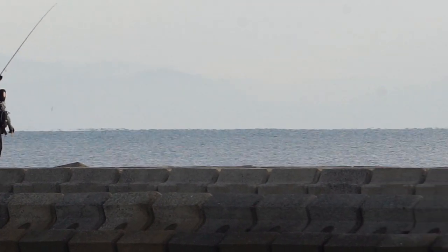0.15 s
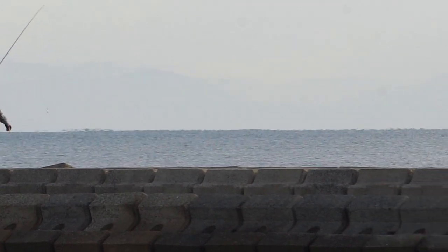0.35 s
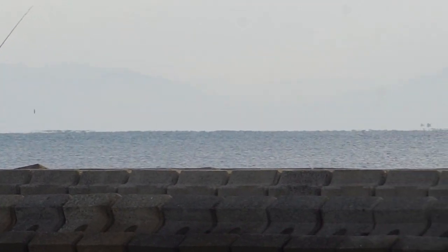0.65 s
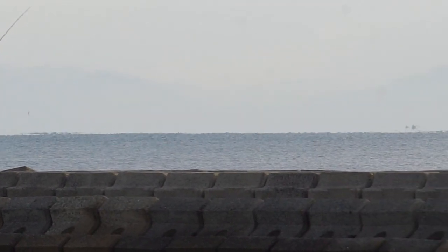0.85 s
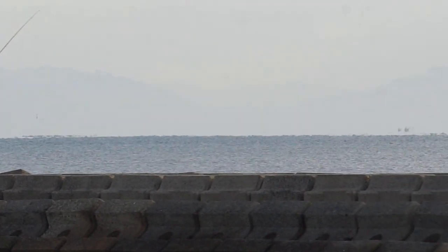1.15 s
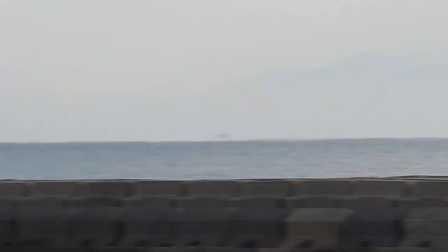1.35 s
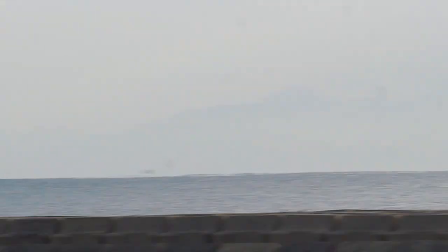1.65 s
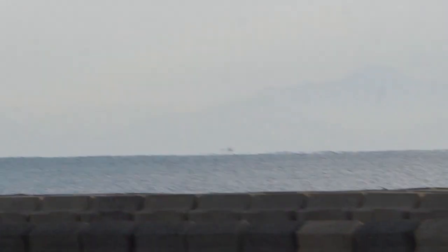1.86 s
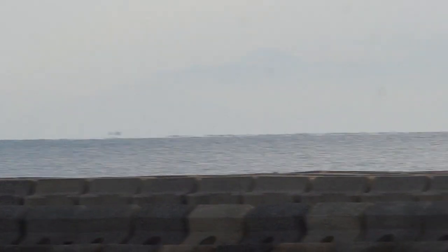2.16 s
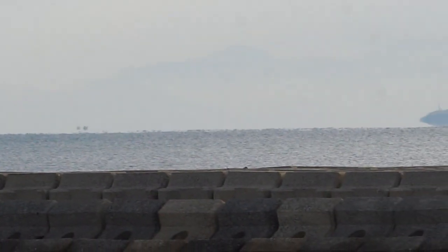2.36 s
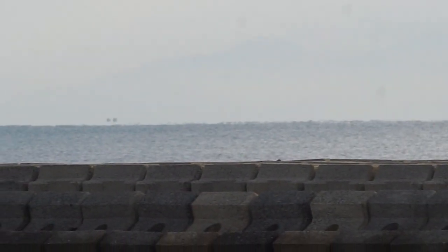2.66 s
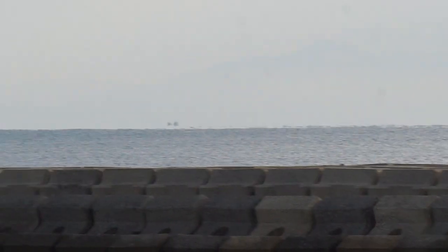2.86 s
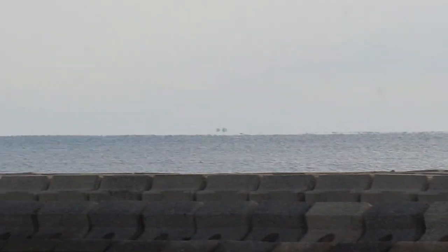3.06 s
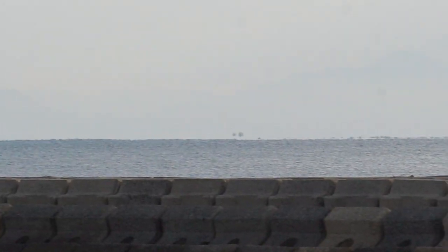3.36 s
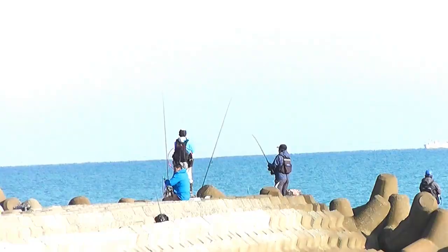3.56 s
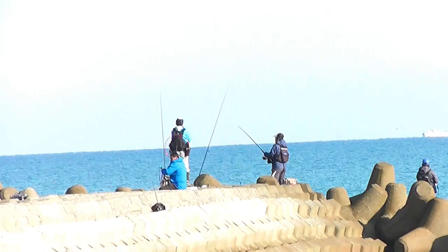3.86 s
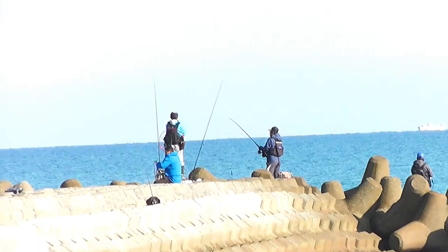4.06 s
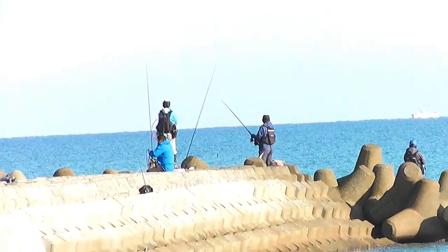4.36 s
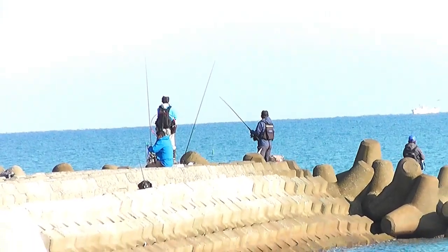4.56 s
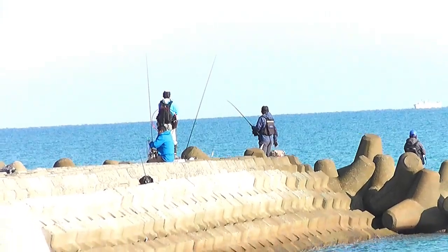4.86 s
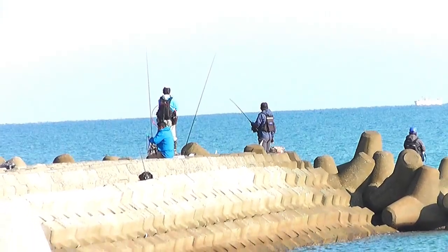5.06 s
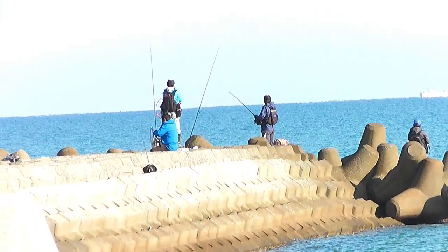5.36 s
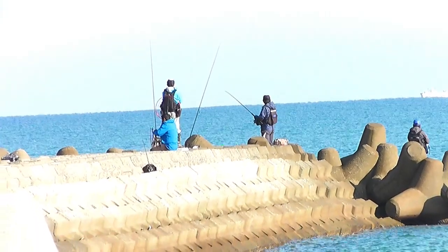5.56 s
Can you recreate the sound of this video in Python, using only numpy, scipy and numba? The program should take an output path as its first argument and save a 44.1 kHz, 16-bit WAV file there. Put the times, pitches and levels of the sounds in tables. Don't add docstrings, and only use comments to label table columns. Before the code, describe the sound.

Small sea waves work against a concrete breakwater, heard very close in stereo. From 0 to about 1.3 s, hollow glugs and round bubbly plops ring between the blocks over a low watery rumble and rushing foam, with light drips. Around 1.5 s a sharp slap of drops clicks on stone, followed at 1.6 to 1.7 s by long bubbles, one rising in pitch. The microphone swings and the water drifts to the right; deep glugs thin out. From 2.2 to 2.9 s the splashing grows busier, with hissing spray, fine mist, crisp ticks and a tiny very high puff near 2.7 s on the right. Wash and drips go on until a hard cut at 3.5 s. Silence lasts until about 3.75 s. Then the same water returns farther away: softer, duller, nearly mono, with muted plops, faint drops and lapping, busiest around 4.6 s, continuing to the end at about 5.7 s.

```python
import sys
import numpy as np
from scipy import signal
from scipy.fft import rfft, irfft
from scipy.io import wavfile
from scipy.ndimage import uniform_filter1d
from numba import njit

SR = 44100
rng = np.random.default_rng(int(sys.argv[2]) if len(sys.argv) > 2 else 0)


def to_wav(sig):
    pcm = np.clip(np.atleast_2d(sig), -1, 1) * 32767
    pcm = np.round(pcm).astype(np.int16)
    wavfile.write(sys.argv[1], SR, pcm.T)


def magnitude_from_level(level_db):
    exponent = np.asarray(level_db, float) / 20
    return 10 ** exponent


N = 251370

CUT_S, RESUME_S = 3.5157, 3.7445
TURN_S, TURN_PAN_DB = (0.61, 3.14), (-2, -5.5)
PUFF_S = 2.695


def rms_one(x):
    return x / np.sqrt(np.mean(x ** 2) + 1e-20)


def at_hz(points, hz):
    point_hz, db = np.transpose(points)
    return np.interp(np.log(hz + 1), np.log(point_hz), db)


def drift(rate):
    r = np.exp(-80 * np.pi * rate / SR)
    slow = signal.lfilter([1], [1, -2 * r, r * r], rng.standard_normal(N // 40 + 2002))[2000:]
    return np.interp(np.arange(N) / 40, np.arange(len(slow)), rms_one(slow))


def bandpass(x, low_hz, high_hz, order):
    return signal.sosfilt(signal.butter(order, [low_hz, high_hz], "band", fs=SR, output="sos"), x)


def lowpass(x, top_hz, order):
    return signal.sosfilt(signal.butter(order, top_hz, fs=SR, output="sos"), x)


def swing(t, ends):
    return np.interp(t, TURN_S, ends) * (t < CUT_S)


def swing_gains():
    return magnitude_from_level(swing(np.arange(N) / SR, TURN_PAN_DB) * np.array([[.5], [-.5]]))


@njit
def add_bubbles(out, start, hz, gain, cycles, rise, lag, turn, pan):
    for k in range(len(start)):
        for i in range(int((1.2 * cycles[k] + 2) * SR / hz[k]) + 8):
            if start[k] + i < out.shape[1]:
                for side in range(2):
                    left = side == 0
                    c = (i - (lag[k] if left else 0.) - max(-lag[k], 0.)) * hz[k] / SR
                    if c > 0:
                        onset = np.sin(min(c, 1.5) * np.pi / 3) ** 2
                        decay = np.exp(-6.9 * max(c - 1.5, 0.) / cycles[k])
                        size = gain[k] * onset * decay * (pan[k] if left else 1 / pan[k])
                        phase = 2 * np.pi * c * (1 + .5 * rise[k] * c) + (turn[k] if left else 0.)
                        out[side, start[k] + i] += size * np.sin(phase)


def water(low_hz, high_hz, colours, lag, turn, alike, per_s, cycles, spread_db, bubble_db, patchy_db):
    far = np.arange(N) > CUT_S * SR
    hz = np.fft.rfftfreq(N, 1 / SR)
    edges = 1 / np.sqrt((1 + (low_hz / (hz + 1)) ** 6) * (1 + (hz / high_hz) ** 12))
    common, left, right = rfft(rng.standard_normal((3, N)))
    together, halves = drift(7.0), [drift(30.0), drift(23.0)]
    upper = 1 / (1 + (low_hz * high_hz / (hz + 1) ** 2) ** 2)
    born = np.flatnonzero(rng.random(N) < per_s * magnitude_from_level(3 * together) / SR)
    draw = rng.random((len(born), 4))
    pitch = low_hz * 0.805 * (1.252 * high_hz / low_hz) ** draw[:, 0]
    out = np.zeros((2, N))
    for place in range(2):
        share = alike[place]
        late = np.exp(1j * turn[place] - 2j * np.pi * hz * lag[place] / SR)
        shared = common * np.array([late, np.ones_like(late)])
        pair = np.sqrt(share) * shared + np.sqrt(1 - share) * np.array([left, right])
        pair *= edges * magnitude_from_level(at_hz(colours[place], hz))
        bed = np.zeros((2, N))
        for half, flicker in zip((1 - upper, upper), halves):
            bed += irfft(pair * half, N) * magnitude_from_level(patchy_db * (together + flicker))

        here = far[born] == place
        p, d = pitch[here], draw[here]
        size = p * magnitude_from_level(at_hz(colours[place], p) - spread_db * np.log(np.maximum(d[:, 1], .04)))
        scatter = (1 - share) * (d[:, 2] - .5)
        pops = np.zeros((2, N))
        add_bubbles(pops, born[here], p, size, cycles * (.5 + d[:, 3]), 0.068 * d[:, 2],
                    lag[place] + 0 * p, turn[place] + 4.4 * scatter, magnitude_from_level(1.2 * scatter))
        pops = irfft(rfft(pops) / (1 + (hz / (0.89 * high_hz)) ** 14), N)
        span = far == place
        out[:, span] = rms_one(rms_one(bed[:, span]) + magnitude_from_level(bubble_db) * rms_one(pops[:, span]))
    return out


# time in seconds, level in dB.
NEAR_WASH = [(0.01, -49), (0.22, -47), (0.33, -47), (0.48, -47.5), (0.8, -49.5), (1.25, -50.5),
             (1.5, -47.5), (1.9, -49), (2.08, -46), (2.24, -49), (2.4, -46.5), (2.55, -45), (2.8, -49),
             (3.05, -48.5), (3.2, -48), (3.5, -48.5)]
FAR_WASH = [(3.8, -58.5), (4.0, -58.5), (4.2, -59.5), (4.4, -57.5), (4.68, -55.5), (4.9, -57.5),
            (5.15, -57.5), (5.4, -57.5), (5.69, -62)]


def wash_level_db():
    s, db = np.transpose(list(NEAR_WASH) + list(FAR_WASH))
    return np.interp(np.arange(N) / SR, s, db)


# frequency in Hz, density in dB per Hz.
NEAR_SEA = [(25, -24), (90, -23), (170, -16), (300, -8), (420, -2), (570, 1), (800, -5.5), (1300, -7),
            (1800, -12.5), (2500, -13.5), (3200, -23), (3800, -29.5), (4500, -42.5), (5500, -70)]
FAR_SEA = [(25, -38), (90, -27), (170, -22.5), (300, -9.5), (420, -1), (570, 5), (800, 1.8), (1300, -2.5),
           (1800, -5.5), (2500, -18), (3250, -34.5), (3550, -57.5), (4500, -60.5), (5500, -52.5)]


def rumble():
    t = np.arange(N) / SR
    level_db = np.where(t < CUT_S, -61 - 2.8 * t, -71 + 0.1 * (t - RESUME_S))
    heave = water(18, 260, (NEAR_SEA, FAR_SEA), lag=(0, 0), turn=(.6, 0), alike=(.3, .95),
                  per_s=40, cycles=2.9, spread_db=1.5, bubble_db=-11.0, patchy_db=0.54)
    return magnitude_from_level(level_db) * heave


def glugs(wash_db):
    t = np.arange(N) / SR
    near = t < CUT_S
    swell_db = wash_db - np.where(near, wash_db[near].mean(), wash_db[t > RESUME_S].mean())
    drain_db = near * -5.5 * np.maximum(t - 0.74, 0)
    level_db = np.where(near, -43.5, -55) + 0.67 * swell_db + drain_db
    sea = (NEAR_SEA, FAR_SEA)
    left = water(263.0, 940, sea, lag=(0, 0), turn=(2.0, .1), alike=(.62, .99),
                 per_s=180, cycles=6.7, spread_db=2.4, bubble_db=-2.0, patchy_db=0.2)
    right = water(270.4, 916, sea, lag=(4.5, 0), turn=(-.3, .1), alike=(.85, .99),
                  per_s=250, cycles=2.8, spread_db=2.3, bubble_db=-6.5, patchy_db=0.98)
    moved = np.interp(t, [1.1, 2.6], [.02, 1.0])
    return magnitude_from_level(level_db) * (np.sqrt(1 - moved) * left + np.sqrt(moved) * swing_gains() * right)


def foam(wash_db):
    near = np.arange(N) / SR < CUT_S
    rush = water(911, 4790, (NEAR_SEA, FAR_SEA), lag=(5.0, 0), turn=(-.2, .12), alike=(.7, .99),
                 per_s=1200, cycles=11.0, spread_db=5.8, bubble_db=-6.0, patchy_db=1.05)
    rush = np.where(near, rush, lowpass(rush, 3450, 8))
    return magnitude_from_level(wash_db + np.where(near, 3.5, 5)) * swing_gains() * rush


# start in seconds, tick peak in dB, thud over tick in dB,
# top under tick in dB, left over right at the top in dB.
NEAR_DROPS = [(0.019, -62, 19, 34, 3.5), (0.1102, -60, -1, 7, 8), (0.197, -70, 34, 0, 3.5),
              (0.4219, -57, 16, 4, 5), (0.529, -61, 13, 10, 3.5), (0.7291, -74, 19, 20.5, 5),
              (1.0257, -48, -0.5, 25, 11), (0.2462, -64, 31, 25, -2), (1.4492, -52, 23, 38, -2),
              (1.5056, -44, 18, 32, 3), (1.508, -45, 16, 23.5, 3), (1.5126, -28.5, 5.5, 18, 4),
              (1.5366, -22, -3.5, 17.5, 13), (1.7368, -57.5, 26, 30.5, 0), (1.793, -50, 8, 15, 4),
              (2.432, -52, -2, 18, -3), (2.366, -57, 3, 11, -3), (2.468, -51, -1.5, 8, -3),
              (2.479, -33.5, 2, 8, 0), (2.7173, -36.5, 8, 6, -3), (2.7191, -30.5, -0.5, 9, -8),
              (2.7557, -30, 6.5, 12.5, -17), (2.8363, -33, 4.5, 13, -6), (2.963, -44.5, 4, 26, 0),
              (3.063, -38.5, 7, 24, -.3), (3.0852, -39, 13.5, 27.5, 7), (3.4107, -43, -7, 6.5, -10),
              (3.4318, -46.5, 27, 10.5, -3), (3.451, -56, -2.5, 16, -2)]
# start in seconds, tick peak in dB.
FAR_DROPS = [(3.7512, -36), (3.776, -58), (4.2376, -62), (4.306, -63), (4.3365, -53), (4.3884, -69),
             (4.7909, -62), (5.1282, -53), (4.4615, -58), (4.6555, -46.5), (4.725, -46), (4.856, -53),
             (4.9733, -63), (5.0705, -47), (5.372, -61), (5.38, -59), (5.387, -59), (5.511, -67)]
BARE_STONE_S = (0.198, 0.422, 1.5368, 2.7175, 2.7193, 2.7559, 3.4105)
# low edge in Hz, high edge in Hz, level in dB.
DROP_PARTS = [
    (1780, 3400, -7),
    (3510, 5550, -5.5),
    (5550, 8000, -2.5),
    (8300, 10300, -4),
    (10600, 12000, -19),
]


def drops():
    far_rows = [(s, db, -4.0, 36, 0) for s, db in FAR_DROPS]
    rows = np.array(list(NEAR_DROPS) + far_rows)
    start_s, tick_db, thud_db, top_loss_db, pan_db = rows.T
    near = start_s < CUT_S
    bare = np.abs(rows[:, :1] - np.array(BARE_STONE_S)).min(axis=1) < .0025
    high_db = -top_loss_db - np.where(bare, 9.5, 23.5)
    topmost_db = high_db - 18 * (np.abs(start_s - PUFF_S) > .07)
    peaks_db = tick_db + np.array([thud_db, 0 * near, -top_loss_db, high_db, topmost_db])

    t = np.arange(1500) / SR / np.where(near, 1, 1.4)[:, None]
    common, left, right = rng.standard_normal((3, len(rows), 1500))
    own = np.where(near, 1.1, .1)[:, None]
    envelope = np.minimum(t / .0008, 1) ** 2 * (np.exp(-t / .0011) + 0.045 * np.exp(-t / 0.0036))
    bursts = (common + own * np.array([left, right])) * envelope
    bursts[:, :, 33] += np.where(near, 4.5, 2.5)

    cracks = np.zeros_like(bursts)
    pan_shares = (.2, .4, 1, 1.3, 1.3)
    for (low_hz, high_hz, part_db), peak_db, pan_share in zip(DROP_PARTS, peaks_db, pan_shares):
        part = bandpass(bursts, low_hz, high_hz, 5)
        part /= np.abs(part).max(axis=2, keepdims=True)
        sides_db = pan_share * pan_db * np.array([[.5], [-.5]])
        cracks += part * magnitude_from_level(peak_db + sides_db + part_db)[:, :, None]
    cracks[:, ~near] = 1.3 * bandpass(cracks[:, ~near], 4250, 5600, 2)

    out = np.zeros((2, N))
    for k, s in enumerate(start_s):
        at, lag = int(s * SR), int(near[k])
        out[0, at + lag:at + lag + 1500] += cracks[0, k]
        out[1, at:at + 1500] += cracks[1, k]
    return out


def splashes(rows, column, floor_db):
    t, power = np.arange(0, N, 32) / SR, magnitude_from_level(2 * floor_db)
    for row in rows:
        start_s, length_s = row[:2]
        attack_db = 1997.5 * np.maximum(start_s - t, 0)
        release_db = 299.5 * np.maximum(t - start_s - length_s, 0)
        power = power + magnitude_from_level(2 * (row[column] - attack_db - release_db))
    return np.interp(np.arange(N) / SR, t, np.sqrt(power))


def patter(per_s, depth, t60):
    lands = (rng.random(N) < per_s / SR) * rng.exponential(1, N)
    lands = uniform_filter1d(lands, size=60) + 1e-18
    return rms_one(1 + depth * signal.lfilter([1], [1, -magnitude_from_level(-60 / (t60 * SR))], lands))


# start in seconds, length in seconds, hiss in dB, finer mist in dB.
NEAR_SPRAY = [(0.025, .02, -70, -101), (0.106, .07, -86, -74), (0.176, 0.032, -81, -65.5),
              (0.252, 0.076, -94, -81.5), (0.413, 0.1, -88, -72), (0.556, 0.06, -85.5, -86),
              (0.722, 0.017, -69, -102), (1.018, 0.027, -73, -99.5), (0.6, 0.45, -84, -106),
              (1.08, 0.52, -76, -104), (1.39, 0.035, -58, -93), (1.506, 0.014, -54, -67),
              (1.55, 0.037, -62.5, -80.5), (1.6, 0.15, -62, -100), (1.793, 0.032, -62, -85),
              (1.84, 0.078, -67, -99), (1.977, 0.29, -65, -96.5), (2.015, .022, -62, -82),
              (2.08, .045, -66, -83), (2.207, .015, -71.5, -79), (2.261, 0.1, -60.5, -79),
              (2.31, .05, -61, -70), (2.365, 0.023, -62, -63), (2.41, 0.013, -57, -63),
              (2.434, .012, -59, -58), (2.464, 0.014, -52, -54.5), (2.526, 0.022, -51.5, -56.5),
              (2.57, 0.061, -55.5, -59.5), (2.635, .015, -54, -60), (2.668, 0.054, -56, -62.5),
              (2.757, 0.018, -63.5, -76), (2.743, 0.18, -61.5, -88), (2.81, .05, -66, -71),
              (2.93, 0.073, -63.5, -99), (3.064, 0.1, -63, -79), (3.178, 0.22, -62, -80),
              (3.42, 0.13, -61, -75)]
# start in seconds, length in seconds, hiss in dB.
FAR_SPRAY = [(3.744, 0.024, -71.5), (3.773, .04, -88), (3.848, .01, -95), (3.915, .035, -99),
             (4.234, .02, -83.5), (4.285, .04, -75), (4.328, .06, -74.5), (4.406, .03, -84),
             (4.46, 0.02, -76), (4.492, .05, -81), (4.549, .07, -72), (4.634, 0.06, -66.5),
             (4.718, 0.03, -72), (4.78, .03, -71.5), (4.845, .06, -74), (4.968, 0.021, -80),
             (5.026, 0.02, -88), (5.067, .02, -73), (5.118, 0.04, -70), (5.171, 0.06, -72.5),
             (5.27, 0.065, -76), (5.365, .02, -81), (5.369, 0.015, -65), (5.422, 0.07, -85.5)]
# frequency in Hz, density in dB per Hz.
NEAR_HISS = [(3000, 5), (3800, -1.5), (4500, -5), (5500, -14), (7000, -17.5), (8000, -29), (9000, -46),
             (10500, -56.5)]
FAR_HISS = [(3000, -1.5), (3700, -13), (4200, 4.5), (4800, 4.5), (5500, -8.5), (6200, -18.5), (7000, -20.5),
            (9000, -47)]


def spray():
    near = np.arange(0, N, 32) / SR < CUT_S
    gain = splashes(list(NEAR_SPRAY) + list(FAR_SPRAY), column=2, floor_db=np.where(near, -87.5, -112))
    hiss = water(2900, 6300, (NEAR_HISS, FAR_HISS), lag=(3.5, 0), turn=(0, 0), alike=(.4, .97),
                 per_s=500, cycles=11.0, spread_db=2.7, bubble_db=-12.0, patchy_db=2.4)
    return gain * swing_gains() * hiss * patter(200, .7, 0.027)


def mist():
    gain = splashes(NEAR_SPRAY, column=3, floor_db=-108)
    hiss = water(6400, 9700, (NEAR_HISS, FAR_HISS), lag=(5.0, 0), turn=(0, 0), alike=(.4, .9),
                 per_s=540, cycles=7.4, spread_db=2.8, bubble_db=-10.5, patchy_db=1.2)
    return gain * mist_sides(hiss) * patter(63, .9, 0.073)


def mist_sides(hiss):
    return hiss


# start in seconds, peak in dB, pitch in Hz.
EARLY_POCKETS = [(0.101, -32.5, 590), (0.117, -34.5, 689), (0.131, -34.5, 1610), (0.149, -37, 1205),
                 (0.161, -42, 2380), (0.183, -29.5, 538), (0.197, -36, 2260), (0.202, -42, 1948),
                 (0.208, -30.5, 855), (0.213, -36, 1170), (0.218, -35, 1500), (0.218, -38.5, 2174),
                 (0.233, -41, 1390), (0.2454, -35, 2390), (0.274, -30, 608), (0.33, -45, 2680),
                 (0.378, -36.5, 1090), (0.423, -45, 2045), (0.446, -29.5, 615), (0.463, -41, 2120),
                 (0.465, -30.5, 552), (0.474, -40, 1740), (0.489, -34.5, 994), (0.496, -38, 1600),
                 (0.54, -45.5, 1940), (0.57, -28.5, 764), (0.592, -34.5, 720), (0.612, -36, 1145),
                 (0.622, -28.5, 559), (0.632, -42, 1320), (0.675, -45, 1430), (0.701, -28, 646),
                 (0.818, -29, 690), (0.873, -47, 1380), (0.966, -36, 1440), (0.968, -43.5, 1940),
                 (0.973, -39, 1001), (0.993, -41, 1320), (1.117, -38.5, 1280), (1.125, -39.5, 559),
                 (1.136, -41, 498), (1.444, -36.5, 726), (1.456, -37.5, 1310), (1.462, -37.5, 337),
                 (1.505, -40.5, 1220), (1.509, -50, 2080), (1.511, -34, 940), (1.51, -46, 3000),
                 (1.51, -42, 1730), (1.51, -37, 664), (1.511, -35, 2440), (1.531, -39, 1230),
                 (1.533, -45, 2480), (1.534, -43, 1560)]
LATER_POCKETS = [(1.707, -45, 1400), (1.735, -35.5, 1720), (1.736, -45.5, 2540), (1.736, -33.5, 1070),
                 (1.797, -36, 660), (1.823, -35.5, 1096), (1.87, -40.5, 500), (1.876, -43.5, 1410),
                 (1.972, -36.5, 1930), (2.019, -38, 1600), (2.028, -44.5, 2799), (2.104, -40, 1539),
                 (2.105, -36, 716), (2.2, -44, 1851), (2.269, -40, 2050), (2.326, -40, 1510),
                 (2.351, -38, 1000), (2.365, -40, 1894), (2.397, -38, 1210), (2.432, -37, 835),
                 (2.49, -32.5, 686), (2.526, -47, 2540), (2.528, -37, 2100), (2.557, -39, 1238),
                 (2.557, -35.5, 596), (2.563, -36.5, 2120), (2.564, -33, 850), (2.585, -37, 1055),
                 (2.603, -38, 1270), (2.618, -39, 1950), (2.669, -39, 1680), (2.7175, -42, 2800),
                 (2.717, -42, 1464), (2.7175, -37, 1750), (2.7168, -36.5, 1170), (2.755, -47, 2770),
                 (2.811, -40.5, 1087), (2.825, -37.5, 1410), (2.849, -42, 1920), (2.873, -40.5, 552),
                 (2.91, -38.5, 1080), (2.932, -42, 2120), (2.982, -43.5, 2600), (2.999, -37, 1400),
                 (3.085, -46, 1959), (3.099, -36.5, 1370), (3.245, -44, 463), (3.274, -41.5, 2030),
                 (3.361, -46, 2056), (3.428, -40, 2130), (3.4316, -46, 1770), (3.4312, -44, 1166),
                 (3.45, -44, 1205)]
FAR_POCKETS = [(3.774, -50, 2440), (3.776, -46, 1970), (3.808, -47, 442), (4.018, -39.5, 547),
               (4.051, -40.5, 870), (4.252, -50, 1345), (4.282, -46, 980), (4.301, -45.5, 1679),
               (4.365, -46, 1711), (4.369, -41, 656), (4.373, -54.5, 2970), (4.385, -41.5, 534),
               (4.429, -47, 1291), (4.461, -42, 503), (4.478, -42, 1230), (4.484, -44, 958),
               (4.488, -45, 1620), (4.584, -44, 1930), (4.606, -45, 1780), (4.639, -43, 770),
               (4.64, -46, 1840), (4.648, -49, 1500), (4.655, -50, 2160), (4.658, -46, 1238),
               (4.71, -40, 1100), (4.771, -44, 1290), (4.825, -49, 1733), (4.86, -47, 2140),
               (4.922, -44.5, 1180), (4.976, -38.5, 790), (4.997, -35.5, 645), (5.03, -50, 1410),
               (5.033, -48, 1730), (5.045, -44, 581), (5.083, -49, 1180), (5.09, -44, 382),
               (5.145, -36.5, 574), (5.154, -56, 1410), (5.208, -53, 1450), (5.258, -40, 603),
               (5.291, -44, 540), (5.303, -48, 1798), (5.304, -46, 577), (5.33, -47.5, 235),
               (5.338, -39, 783), (5.383, -43, 549), (5.438, -43, 1104), (5.469, -36, 533),
               (5.471, -44.5, 1335), (5.495, -47, 1550), (5.509, -52, 1860), (5.514, -52.5, 2390),
               (5.568, -38, 620), (5.583, -38, 670), (5.625, -39.5, 584)]
# start in seconds, peak in dB, pitch in Hz.
GULPS = [(0.144, -47, 298), (0.167, -41.5, 297), (0.345, -42, 279), (0.409, -44.5, 250),
         (0.457, -49.5, 201), (0.462, -33, 398), (0.587, -38, 326), (0.594, -49, 180), (0.93, -55.5, 134),
         (1.41, -47, 382), (1.416, -58, 276), (1.464, -50, 387), (1.509, -43.5, 328), (1.737, -42, 400),
         (1.934, -47, 324), (2.017, -55, 184), (2.094, -55, 185), (2.957, -52.5, 410), (2.961, -57, 324),
         (2.985, -57.5, 193), (2.991, -54, 368), (3.044, -64.5, 247), (3.21, -59, 340), (3.312, -57, 333),
         (3.335, -57, 432), (3.361, -55, 382), (3.417, -55, 430), (3.43, -61, 277), (3.464, -56, 269),
         (3.953, -62, 247), (4.202, -48.5, 388), (4.327, -56, 279), (4.393, -51.5, 370), (4.53, -51, 380),
         (4.563, -53, 219), (4.648, -54, 301), (4.847, -55, 294), (4.875, -52, 272), (4.946, -53, 242),
         (5, -53, 240), (5.083, -43, 370), (5.229, -49, 258), (5.276, -48.5, 244), (5.276, -48, 322),
         (5.277, -43, 422), (5.328, -54.5, 256), (5.585, -49.5, 440), (5.62, -55.5, 284)]
# start in seconds, peak in dB, start pitch in Hz, a third of the
# cycles taken to die away by 60 dB, rise per cycle.
CHIRPS = [
    (1.618, -36.5, 682, 65, .037),
    (1.689, -40, 1306, 28, 0.002),
]


def pockets():
    out = np.zeros((2, N))
    rows = list(EARLY_POCKETS) + list(LATER_POCKETS) + list(FAR_POCKETS) + list(GULPS)
    s, peak_db, hz = np.transpose(rows)
    near, deep = s < CUT_S, hz < 900
    gain = magnitude_from_level(peak_db + np.where(near, 1.5, -1.5))
    cycles = np.maximum(hz * np.where(near, 0.028, 0.035), 7.1)
    lag = 4.8 * near * ~deep
    lead_rad = swing(s, (1.97, -0.35)) * deep
    pan = magnitude_from_level(swing(s, TURN_PAN_DB) / 2)
    add_bubbles(out, (s * SR).astype(np.int64), hz, gain, cycles, 3.1 / hz, lag, lead_rad, pan)

    s, peak_db, hz, cycles, rise = np.transpose(CHIRPS)
    add_bubbles(out, (s * SR).astype(np.int64), hz, magnitude_from_level(peak_db), 3 * cycles, rise,
                5.4 + 0 * s, 0 * s, magnitude_from_level(-2.5 + 0 * s))
    return out


# low edge in Hz, high edge in Hz, level in dB.
PUFF_BANDS = [
    (11800, 13900, 0),
    (14700, 15900, 2),
]


def puff():
    white = rng.standard_normal((2, N))
    hiss = sum(magnitude_from_level(db) * bandpass(white, low_hz, high_hz, 6) for low_hz, high_hz, db in PUFF_BANDS)
    envelope = np.exp(-((np.arange(N) / SR - PUFF_S) / .021) ** 4)
    return magnitude_from_level(-75) * hiss * envelope * magnitude_from_level([[-3], [3]])


def scene():
    wash_db = wash_level_db()
    sea = rumble() + glugs(wash_db) + foam(wash_db)
    return sea + spray() + mist() + pockets()


QUIET_EDGES_HZ = [3790, 4220, 4650, 5300, 5700, 6290, 6890, 7580, 8270, 9200, 10340, 12000]


def drop_quiet(x, near_limit_db, far_limit_db):
    hz, s, frames = signal.stft(x, SR, nperseg=1024)
    for low, high in zip(QUIET_EDGES_HZ, QUIET_EDGES_HZ[1:]):
        band = (hz >= low) & (hz < high)
        power = np.mean(np.abs(frames[:, band]) ** 2, axis=(0, 1), keepdims=True)
        level_db = uniform_filter1d(10 * np.log10(power + 1e-30), size=3)
        tilt_db = -10 * np.log2(low / 6000)
        limit_db = np.where(s < CUT_S, near_limit_db + tilt_db, far_limit_db)
        frames[:, band] *= np.clip((level_db - limit_db) / 2, 0, 1)
    return signal.istft(frames, SR, nperseg=1024)[1][:, :N]


def roll_off(x):
    return signal.sosfilt(signal.butter(12, 16000, fs=SR, output="sos"), x)


def record(dry):
    t = np.arange(N) / SR
    heard = drop_quiet(dry, -113, -121) + drops() + puff()
    gate = (t < CUT_S) + np.clip((t - RESUME_S) / 0.02, 0, 1)
    remnant = (t >= CUT_S) * magnitude_from_level(-23) * np.clip(1 - (t - CUT_S) / .018, 0, 1) ** .6
    self_noise = magnitude_from_level(-99) * rng.standard_normal((2, N)) * (gate > 0)
    return roll_off(heard * gate + lowpass(heard, 4000, 4) * remnant + self_noise)


dry = scene()
out = record(dry)
to_wav(out)
```